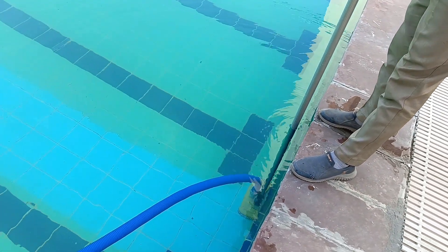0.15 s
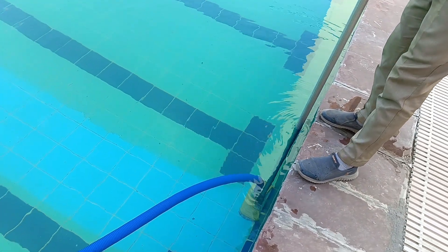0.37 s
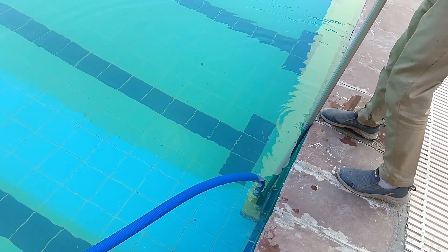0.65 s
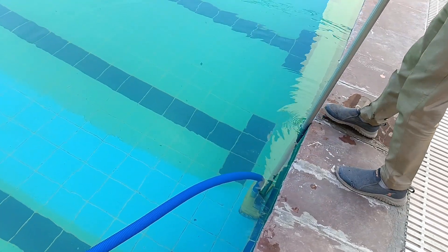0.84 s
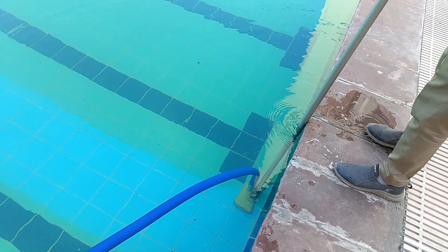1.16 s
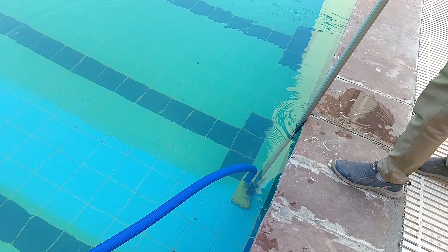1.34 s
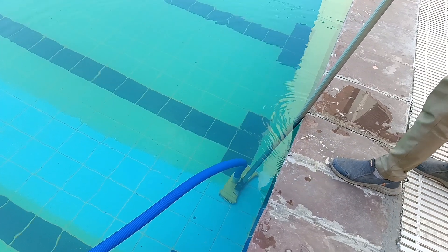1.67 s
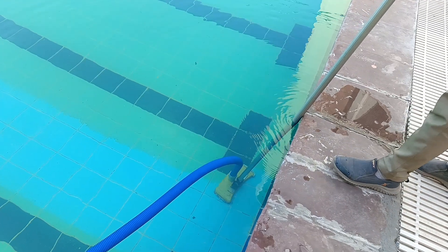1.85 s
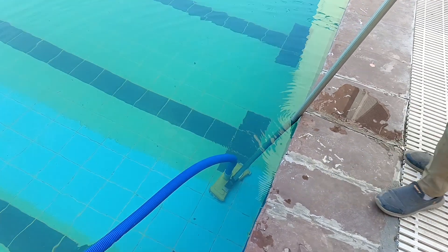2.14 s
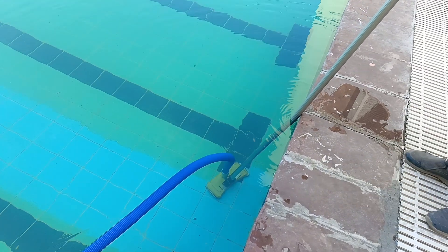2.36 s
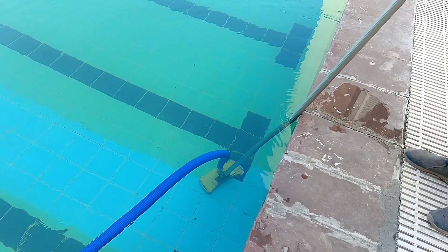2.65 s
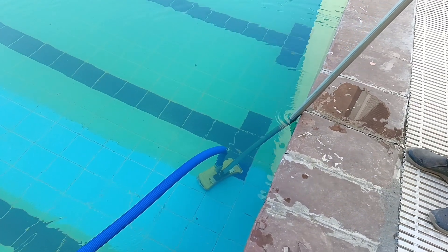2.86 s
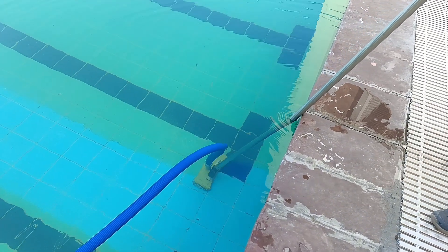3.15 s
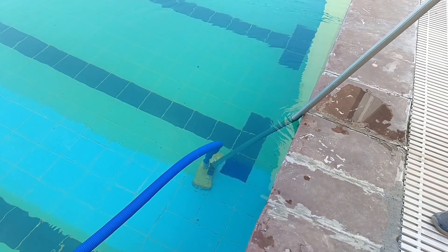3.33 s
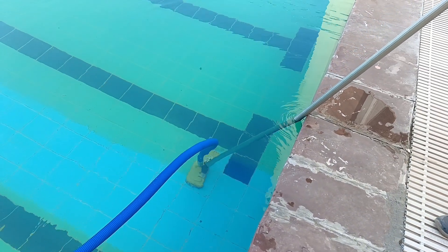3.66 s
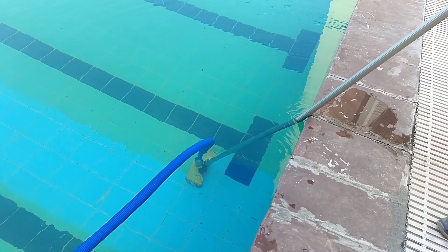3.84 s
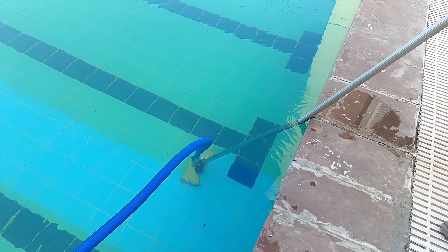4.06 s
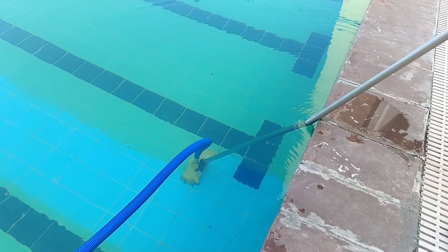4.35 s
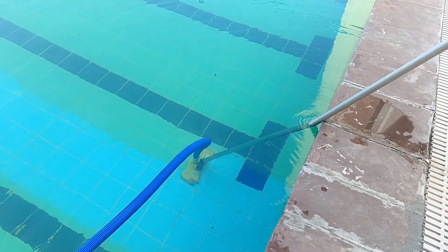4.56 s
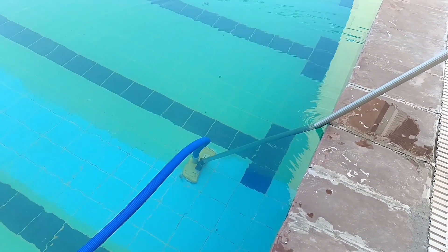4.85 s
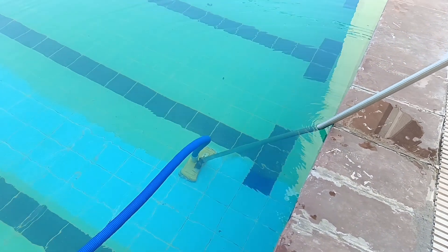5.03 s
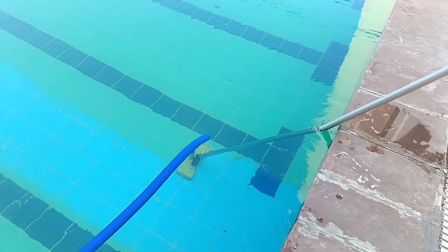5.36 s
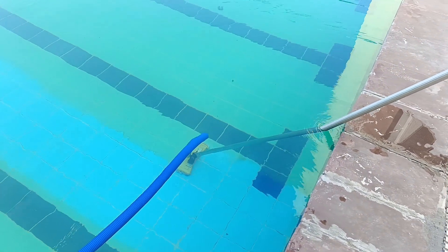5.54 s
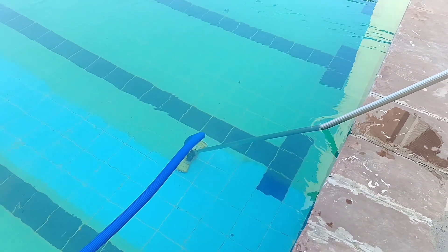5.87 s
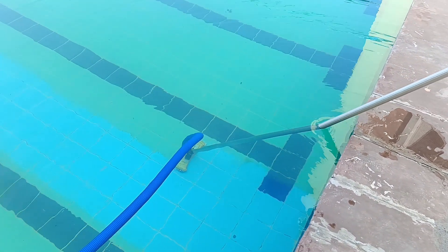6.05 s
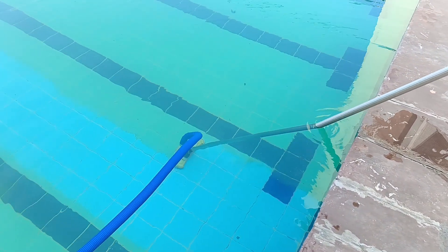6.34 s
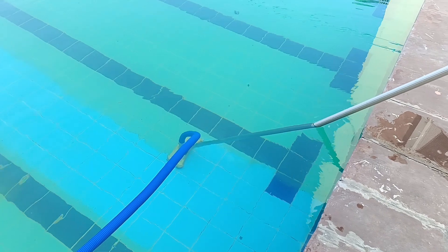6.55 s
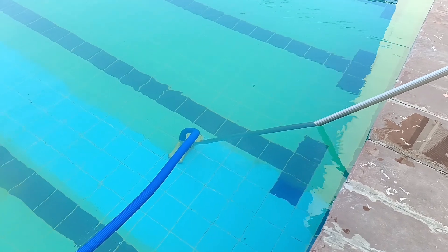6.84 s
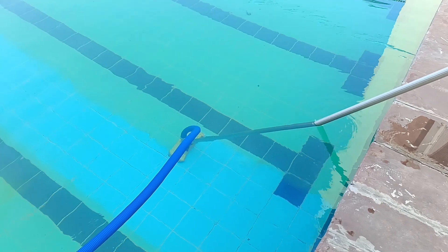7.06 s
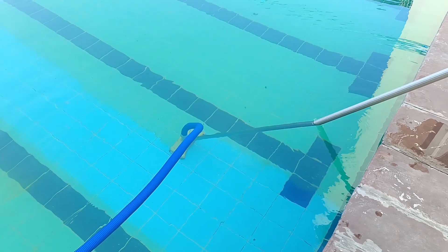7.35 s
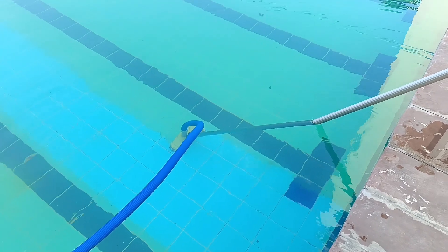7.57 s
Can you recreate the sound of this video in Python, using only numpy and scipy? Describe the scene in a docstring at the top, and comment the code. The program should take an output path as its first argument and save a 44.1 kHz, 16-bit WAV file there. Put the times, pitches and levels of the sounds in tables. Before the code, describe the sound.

A pool pump hums steadily over churning water while shoes scuff on gritty stone and a metal pole slides through hands.

```python
"""A pool pump hums and throbs some way off, over the roar of the water it draws through a hose.
Close by, a person guiding the vacuum pole shuffles back over gritty stone paving: soles tap and
scuff, sand cracks under them, and there are two faint squeaks. The metal pole slides and catches
in the hands, which rings its thin wall. Heard outdoors by a small camera with two microphone ports."""
import sys
import numpy as np
from scipy import signal
from scipy.fft import rfft, irfft
from scipy.io import wavfile
from scipy.ndimage import uniform_filter1d

SR = 44100
rng = np.random.default_rng(int(sys.argv[2]) if len(sys.argv) > 2 else 0)


def bounce(signal):
    """Save signal as a 16-bit WAV file at the path given by the first command-line argument."""
    frames = np.transpose(np.atleast_2d(signal))
    limited = np.clip(frames, -1, 1)
    pcm = np.round(limited * 32767).astype(np.int16)
    wavfile.write(sys.argv[1], SR, pcm)


N = 339614
TIME, FREQS = np.arange(N) / SR, np.fft.rfftfreq(N, 1 / SR)
BAND_LIMIT_HZ = 15800


def gain_of(db):
    """Decibels to amplitude."""
    return 10 ** (np.asarray(db) / 20)


def unit_rms(x):
    """Scales to an rms of one."""
    return x / np.sqrt(np.mean(abs(x) ** 2) + 1e-20)


def curve(points, hz, column=1):
    """One table column, interpolated over log frequency."""
    columns = np.transpose(points)
    return np.interp(np.log(hz + 1), np.log(columns[0] + 1), columns[column])


def add(mix, start_s, sound):
    """Mixes in a stereo sound."""
    part = mix[:, max(round(start_s * SR), 0):][:, :sound.shape[1]]
    part += sound[:, :part.shape[1]]


def swell(t, half_s):
    """Gaussian rise and fall about t = 0."""
    return np.exp(-.5 * (t / half_s) ** 2)


def wander(rate_hz, points=2048):
    """Slow complex noise of unit rms."""
    hz = np.fft.fftfreq(points, N / SR / points)
    slow = np.fft.ifft(np.exp(2j * np.pi * rng.random(points)) / (1 + (hz / rate_hz) ** 2))
    return unit_rms(np.interp(TIME, np.linspace(0, N / SR, points), slow))


def coloured(burst, colour, tilt_db_per_oct, peak_hz, peak_db, width_oct):
    """Shapes a burst by a colour table, a tilt and one peak, at about the same power."""
    hz = np.fft.rfftfreq(burst.shape[1], 1 / SR)
    low_hz = colour[0][0]
    octaves = np.log2(np.clip(hz, low_hz, BAND_LIMIT_HZ) / peak_hz)
    shape_db = curve(colour, hz) + tilt_db_per_oct * octaves + peak_db / (1 + (octaves / width_oct) ** 2)
    band = (hz < BAND_LIMIT_HZ) * hz / (hz + low_hz)
    return irfft(rfft(burst) * unit_rms(gain_of(shape_db) * band), burst.shape[1])


def minimum_phase(gain):
    """Adds the phase that makes a spectrum ring after a blow, never before."""
    log_gain = np.log(np.maximum(gain, 1e-5))
    mirrored = np.concatenate([log_gain, log_gain[-2:0:-1]])
    return gain * np.exp(-1j * signal.hilbert(mirrored).imag[:len(gain)])


def tone(hz, level_db, flutter_depth=0, left_lead_rad=0, flutter_hz=3.3):
    """A stereo sine, fluttering in level and phase."""
    carrier = np.exp(2j * np.pi * (hz * TIME + rng.random()))
    line = carrier * unit_rms(1 + flutter_depth * wander(flutter_hz))
    port_phase = np.exp(.5j * left_lead_rad * np.array([[1], [-1]]))
    return np.sqrt(2) * gain_of(level_db) * (line * port_phase).real


# Shaft lines, mostly multiples of three blades: order, level_db, flutter_depth, left_lead_rad
SHAFT_ORDERS = [(3, -41, 0.065, 0), (6, -45, 1, -0.1), (9, -35, 0.021, 0.32), (12, -48.5, 0.71, -0.2),
                (15, -49.5, 0.45, 0.5), (21, -56.5, 0.18, .1), (22, -46, 0.093, -.7), (23, -55, 1, 0)]
# Magnetic hum: harmonic, level_db, flutter_depth, left_lead_rad
MAINS_HARMONICS = [(2, -47, 0.1, 0.03), (6, -60.5, 0.33, .1)]
# Thin whines: pitch_hz, level_db, flutter_depth, left_lead_rad
MOTOR_WHINES = [(343.8, -53, .4, 1), (842, -62, .9, 0), (1473.9, -59.5, .3, -2.4), (1965.2, -69, .4, -.2)]
def motor(shaft_hz=23.85, mains_hz=50):
    """Shaft, blades and magnetic field each give tones of steady pitch."""
    shaft = sum(tone(order * shaft_hz, *rest) for order, *rest in SHAFT_ORDERS)
    mains = sum(tone(harmonic * mains_hz, *rest) for harmonic, *rest in MAINS_HARMONICS)
    return shaft + mains + sum(tone(*row) for row in MOTOR_WHINES)


# Brief swells and dips of the low hum near 215 Hz: middle_s, half_length_s, change_db
LOW_HUM_SWELLS = [(.3, 0.17, -5.5), (0.673, 0.039, 10.5), (0.884, 0.076, -8.5), (1.093, 0.049, 9),
                  (1.253, 0.058, -4), (1.85, 0.11, -5), (3.5, 0.14, 3.5), (4.152, 0.072, 7),
                  (5.28, 0.23, 4)]
def throbbing(hum, centre_hz=215, width_hz=29):
    """The low hum swells or dips briefly."""
    band = irfft(rfft(hum) * np.exp(-((FREQS - centre_hz) / width_hz) ** 2), N)
    change_db = sum(db * swell(TIME - middle_s, half_s) for middle_s, half_s, db in LOW_HUM_SWELLS)
    return hum + band * (gain_of(change_db) - 1)


# Pump and pipe resonances: pitch_hz, width_hz, level_db
PIPE_MODES = [(168, 9.5, -36), (215, 17, -37.5)]
# Brief booms of the lower one: middle_s, half_length_s, level_db
PIPE_BOOMS = [(1.3, .022, -29.5), (5.828, .025, -28.5)]
def pipes():
    """Turbulence keeps two low resonances ringing; the upper beats with the ninth shaft order."""
    churn = np.exp(2j * np.pi * rng.random(len(FREQS)))
    ringing = sum(gain_of(db) * unit_rms(irfft(churn / (1 + 1j * (FREQS - hz) / width_hz) ** 3, N))
                  for hz, width_hz, db in PIPE_MODES)
    lower_hz = PIPE_MODES[0][0]
    booms = sum(tone(lower_hz, db) * swell(TIME - middle_s, half_s) for middle_s, half_s, db in PIPE_BOOMS)
    return ringing + booms


# Churning spectrum, low range: freq_hz, density_db_per_hz
ROAR_SPECTRUM = [(20, -80.5), (39, -79), (52, -65.5), (88, -63.5), (125, -57.5), (190, -57), (228, -52),
                 (280, -58), (385, -67), (450, -65.5), (580, -69.5), (680, -68.5), (1000, -74)]
# Churning spectrum, high range: freq_hz, density_db_per_hz
HISS_SPECTRUM = [(1000, -73.5), (2000, -77), (2700, -82.5), (3650, -89.5), (4300, -99), (5400, -97.5),
                 (6000, -101.5), (6500, -100), (7400, -105.5), (8400, -107), (9500, -106.6),
                 (11500, -118.5), (14000, -126), (15700, -130)]
# Likeness of the roar at the two ports: freq_hz, coherence, left_lead_rad
ROAR_COHERENCE = [(60, .97, 0), (220, .99, 0), (380, .86, -.3), (650, .72, -.2), (900, .43, 0),
                  (1300, .16, -.5), (1750, .36, -1.3), (2250, .54, -1.4), (3000, .27, -2.7),
                  (4000, .12, -3.6), (5300, .22, -3.1), (8000, .05, -3)]
def water_roar(echo_gain=0.28, echo_s=1 / 207, surge_db=0.6):
    """Water and air churn in the pump; a reflection off the paving combs the noise."""
    left, independent = np.exp(2j * np.pi * rng.random((2, len(FREQS))))
    coherence = curve(ROAR_COHERENCE, FREQS)
    right = coherence * left + np.sqrt(1 - coherence ** 2) * independent
    right *= np.exp(-1j * curve(ROAR_COHERENCE, FREQS, column=2))
    echo_colour = curve([(500, .11), (1000, .25), (2000, 1), (4000, .2)], FREQS)  # freq_hz, gain
    comb = 1 - echo_gain * echo_colour * np.exp(-2j * np.pi * FREQS * echo_s)
    crossover_hz = ROAR_SPECTRUM[-1][0]
    density_db = np.where(FREQS < crossover_hz, curve(ROAR_SPECTRUM, FREQS), curve(HISS_SPECTRUM, FREQS))
    noise = irfft(np.array([left, right]) * comb * gain_of(density_db), N) * np.sqrt(N * SR / 2)
    return noise * gain_of(surge_db * unit_rms(wander(rate_hz=8).real))


def grit(samples, shared_power, grain_db):
    """Dense tiny slips of uneven size, partly shared by the two ports."""
    shared, left, right, grains = rng.standard_normal((samples, 4)).T
    grains = unit_rms(uniform_filter1d(grains, size=50))
    noise = np.sqrt(shared_power) * shared + np.sqrt(1 - shared_power) * np.array([left, right])
    return unit_rms(noise * gain_of(grain_db * grains))


# Tap spectrum: freq_hz, gain_db
TAP_SPECTRUM = [(400, -8), (1300, 1), (2700, -1), (3600, 1), (4600, -5), (6700, -7), (8300, -16),
                (9700, -18), (11500, -31), (13500, -32), (15700, -34)]
# Soles and grit on stone, the long ones skidding: start_s, level_db, tilt_db_per_oct, peak_hz, decay_s
SOLE_TAPS = [(.2415, -55, 6, 8000, .003), (.679, -59, 16, 14000, .004), (.722, -53, 8, 13000, .004),
             (0.829, -48, 5, 8000, 0.0036), (.8535, -49, 3, 7500, .003), (1.012, -53, 7, 8500, .02),
             (0.9399, -33.5, 3.5, 3500, .004), (2.6577, -28.3, -4, 1650, .0045),
             (3.2886, -28, -2.8, 5650, .0025), (3.332, -56, 10, 10500, .012), (3.931, -53, 5, 7000, .004),
             (4.535, -55, 11, 10000, .002)]
def taps(rise_s=0.00025, scatter_db=-21, scatter_s=.012):
    """Dry cracks die as the sole comes to rest; paving and water scatter a faint tail."""
    out, t = np.zeros((2, N)), np.arange(SR // 10) / SR
    for start_s, db, tilt, peak_hz, decay_s in SOLE_TAPS:
        slips = grit(len(t), shared_power=0.35, grain_db=1.8)
        crack = coloured(slips, TAP_SPECTRUM, tilt, peak_hz, peak_db=7, width_oct=.12)
        rise = 1 - np.exp(-t / rise_s)
        fall = np.hypot(np.exp(-t / decay_s), gain_of(scatter_db) * np.exp(-t / scatter_s))
        add(out, start_s, gain_of(db) * crack * rise * fall)
    return out


def sand(grains_per_s=450, spread_db=4, decay_s=.0003):
    """One second of grains cracking at random under a sole."""
    sizes = gain_of(spread_db * np.minimum(rng.exponential(1, SR), 3))
    impulses = sizes * (rng.random(SR) < grains_per_s / SR)
    cracks = signal.lfilter([1], [1, -np.exp(-1 / (decay_s * SR))], impulses)
    return unit_rms(cracks * grit(SR, shared_power=0.44, grain_db=1.5))


def rub(half_s, grain_db, judder_db=0):
    """Gritty friction swelling at the middle of one second, with optional stick-slip judder."""
    t = np.arange(SR) / SR - .5
    judder = unit_rms(uniform_filter1d(rng.standard_normal(SR), size=400))
    slips = grit(SR, shared_power=0.18, grain_db=grain_db)
    return unit_rms(slips * gain_of(judder_db * judder)) * swell(t, half_s)


# Scuff spectrum: freq_hz, gain_db
SCUFF_SPECTRUM = [(800, -19), (2500, 3), (4400, 3.5), (5600, 4.5), (6100, 0.5), (6900, 2.5), (8000, -4),
                  (9300, -4), (11300, -17.5), (13200, -13.5), (15700, -15.5)]
# Rubs of soles and cloth: middle_s, half_length_s, level_db, tilt_db_per_oct, peak_hz
STEP_SCUFFS = [(0.705, 0.02, -63.5, 5, 9700), (0.829, 0.011, -53.5, 4.5, 6900),
               (.931, .010, -49.5, 1, 7800), (0.966, 0.022, -53, 2.5, 6600), (1.034, 0.008, -56, 6, 8500),
               (1.053, 0.025, -56.5, 4.5, 6600), (2.18, 0.011, -52, -3, 5400), (2.212, 0.02, -61, 0, 5300),
               (2.405, 0.018, -60, 1, 7000), (2.656, 0.034, -55.5, -2, 6700), (3.075, 0.087, -61, -3, 6900),
               (3.343, .008, -55.5, 2.5, 10400), (3.366, .011, -54.5, 2, 10400), (5.09, .05, -64, -6, 6900)]
def scuffs(sand_share=.4):
    """Soles and trouser legs drag, and sand crunches in the rub."""
    out, t = np.zeros((2, N)), np.arange(SR) / SR - .5
    for middle_s, half_s, db, tilt, peak_hz in STEP_SCUFFS:
        crunch = np.sqrt(sand_share) * sand() * swell(t, half_s)
        drag = np.sqrt(1 - sand_share) * rub(half_s, grain_db=-2.5)
        scuff = coloured(drag + crunch, SCUFF_SPECTRUM, tilt, peak_hz, peak_db=5.5, width_oct=0.095)
        add(out, middle_s - .5, gain_of(db) * scuff)
    return out


# Faint squeaks: middle_s, half_length_s, level_db, pitch_hz, glide_oct_per_s
FALLING_SQUEAKS = [(0.866, 0.016, -53, 3190, -1), (4.05, .016, -68, 4290, -2.8)]
def squeaks(rough_depth=1.2, rough_hz=90):
    """Thin, rough tones that slide down."""
    out, t = np.zeros((2, N)), np.arange(-SR // 8, SR // 8) / SR
    for middle_s, half_s, db, hz, glide in FALLING_SQUEAKS:
        cycles = np.cumsum(hz * 2 ** (glide * t)) / SR
        roughness = 1 + rough_depth * wander(rough_hz)[:len(t)]
        line = unit_rms((np.exp(2j * np.pi * cycles) * roughness).real)
        add(out, middle_s + t[0], gain_of(db) * line * swell(t, half_s) * np.ones((2, 1)))
    return out


# Tube wall resonances: pitch_hz, width_hz, level_db
WALL_MODES = [(6560, 200, 3.5), (6950, 200, 2.5), (7430, 80, 0), (8760, 170, -5), (9300, 150, -3),
              (10900, 60, -16), (12720, 80, -5.5), (13300, 120, -4), (13800, 110, -9), (14600, 170, -13),
              (15500, 330, -8)]
# Friction spectrum between them: freq_hz, level_db
WALL_RASP = [(1500, -16), (4000, -5), (5600, -10), (6150, -14), (7300, -7.5), (9500, -10.5), (10200, -13),
             (11800, -26), (12800, -9.5), (14100, -19), (15700, -14)]
def tube_wall(friction):
    """The thin metal wall filters friction; its modes add in power over a broad rasp."""
    mode_power = sum(gain_of(db) ** 2 / (1 + (2 * (FREQS - hz) / width_hz) ** 2)
                     for hz, width_hz, db in WALL_MODES)
    rasp_power = gain_of(curve(WALL_RASP, FREQS)) ** 2
    response = unit_rms(np.sqrt(mode_power + rasp_power))
    return irfft(rfft(friction) * minimum_phase(response), N)


def grip_creeps(from_s=2.5, to_s=5.2, slips_per_s=16, level_db=-75, spread_db=2, decay_s=.012):
    """Tiny random slips as the pole is pushed, as rows of start_s, level_db, decay_s."""
    span_s = to_s - from_s
    return [(from_s + when * span_s, level_db + spread_db * (2 * size - 1), decay_s)
            for when, size in rng.random((round(span_s * slips_per_s), 2))]


# Pole sliding through the hands: middle_s, half_length_s, level_db
POLE_SLIDES = [(1.425, 0.06, -62), (1.51, .018, -51.5), (1.575, 0.033, -51.5), (1.671, 0.065, -63),
               (1.801, 0.03, -62), (1.899, 0.012, -60), (1.95, 0.018, -58), (2.033, .008, -61),
               (3.098, 0.099, -70), (3.353, .016, -63), (5.087, .055, -66)]
# Grip catching on the pole: start_s, level_db, decay_s
GRIP_CATCHES = [(1.3479, -54, .003), (1.4641, -48.5, .003), (1.5125, -48, .003), (1.7664, -44.5, .004),
                (1.7714, -43.5, .004), (1.828, -51, .002), (1.941, -46, .005), (1.949, -49, .003)]
def pole(ring_hz=6562, ring_db=-16, ring_t60_s=.2, ring_left_db=-4):
    """Slides, catches and creep of the grip drive the tube; one mode rings on after each catch."""
    friction, ringing, t = np.zeros((2, N)), np.zeros((2, N)), np.arange(SR // 4) / SR
    for middle_s, half_s, db in POLE_SLIDES:
        add(friction, middle_s - .5, gain_of(db) * rub(half_s, grain_db=3.2, judder_db=1.8))
    for start_s, db, decay_s in list(GRIP_CATCHES) + grip_creeps():
        slip = grit(len(t), shared_power=0.37, grain_db=2.5) * np.exp(-t / decay_s)
        add(friction, start_s, gain_of(db) * slip)
    for start_s, db, _ in GRIP_CATCHES:
        envelope = gain_of(db + ring_db - 60 * t / ring_t60_s)
        ring = envelope * np.sin(2 * np.pi * (ring_hz * t + rng.random()))
        add(ringing, start_s, ring * gain_of([[ring_left_db], [0]]))
    return tube_wall(friction) + ringing


def through_ports(sound, balance):
    """Each microphone port colours a sound according to its direction."""
    port_db = curve(balance, FREQS) * np.array([[.5], [-.5]])
    return irfft(rfft(sound) * gain_of(port_db), N)


# Port balance towards the pump: freq_hz, left_minus_right_db
PUMP_BALANCE = [(100, -2), (2000, -1.7), (3600, -6.8), (4500, -1), (5900, 2), (7300, -9.5), (8900, -2.6),
                (9700, 2), (11700, 4.5), (13300, -1), (15700, -1.5)]
# Port balance towards feet and hands, on the right: freq_hz, left_minus_right_db
PERSON_BALANCE = [(2000, -1.5), (3500, -5), (4800, 0), (6300, -4), (7300, -1), (8800, -7), (10300, -1),
                  (11500, 2), (13000, 0), (14400, -3.5), (15700, -4)]
def scene():
    """The pump some way off; footwork and pole close by."""
    pump = throbbing(motor()) + pipes() + water_roar()
    person = scuffs() + taps() + squeaks() + pole()
    return through_ports(pump, PUMP_BALANCE) + through_ports(person, PERSON_BALANCE)


def record(dry):
    """The camera's band limit."""
    low_pass = signal.firwin(511, BAND_LIMIT_HZ, window=("kaiser", 9), fs=SR)
    return signal.oaconvolve(dry, low_pass[None], "same")


dry = scene()
out = record(dry)
bounce(out)
```